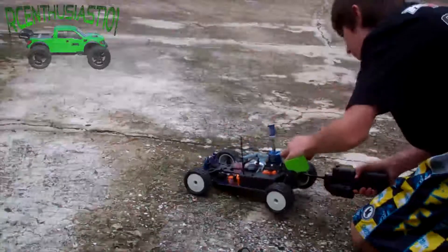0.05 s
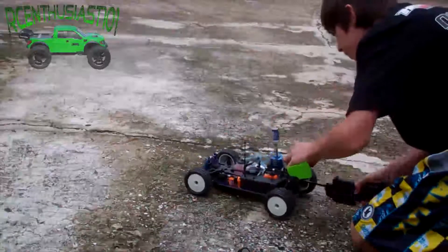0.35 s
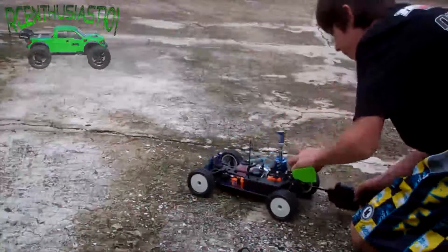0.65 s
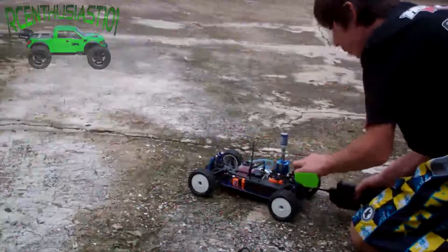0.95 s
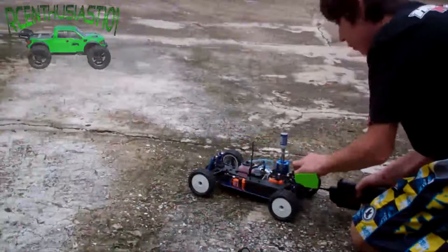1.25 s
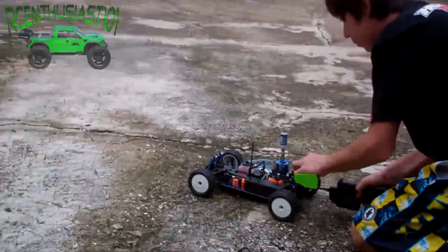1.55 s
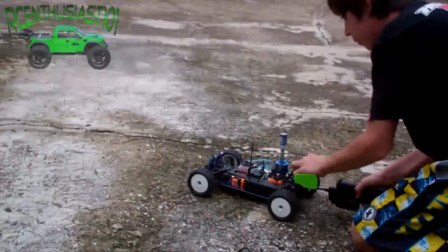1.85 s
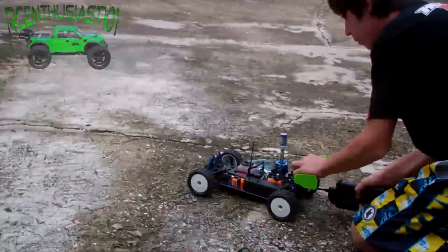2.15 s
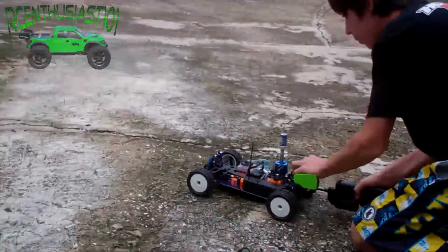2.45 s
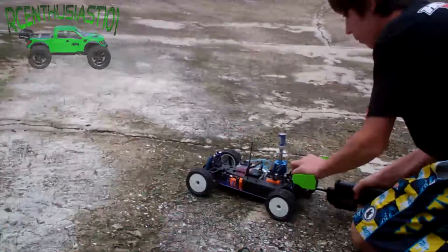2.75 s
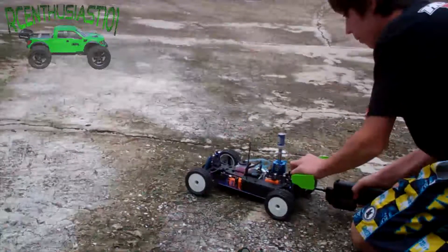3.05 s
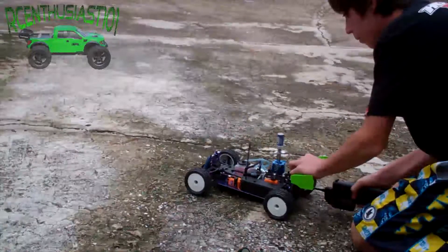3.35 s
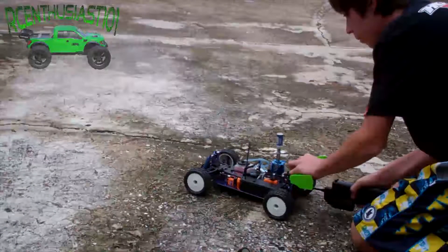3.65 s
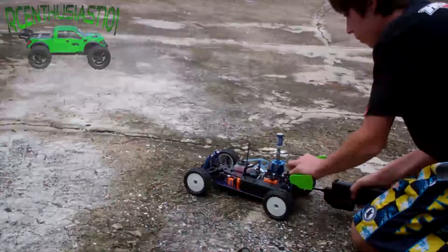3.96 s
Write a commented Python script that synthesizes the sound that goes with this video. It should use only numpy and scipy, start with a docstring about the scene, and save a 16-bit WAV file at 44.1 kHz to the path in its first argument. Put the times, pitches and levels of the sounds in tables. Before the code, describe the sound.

A model car engine is turned over by a hand-held electric starter in a concrete yard. After a few clicks over a faint low rumble, a fast, rasping gear rattle with puffing exhaust runs on without firing.

```python
"""A concrete yard, where a hand-held electric starter cranks the small glow engine of a model car.
The starter shaft clicks into its socket, then the gears grind and turn the engine about 32 times a
second without it catching. Every turn gives an exhaust puff, a knock as the gear play is taken up, and
a short rasp; the chassis rings and loose parts ping. A wall returns a dull echo, and a low outdoor
rumble lies beneath."""
import sys
import numpy as np
from scipy import signal
from scipy.fft import rfft, irfft
from scipy.io import wavfile

SR = 44100
rng = np.random.default_rng(int(sys.argv[2]) if len(sys.argv) > 2 else 0)


def wrap_up_sound(samples):
    """Save the sound to the file named by the first command line argument, as 16-bit audio."""
    columns = np.atleast_2d(samples).T
    # keep every value between -1 and 1, then stretch to whole-number steps
    tamed = np.clip(columns, -1, 1)
    steps = np.round(tamed * 32767).astype(np.int16)
    wavfile.write(sys.argv[1], SR, steps)


N = 176400
TIME = np.arange(N) / SR
HZ = np.maximum(np.fft.rfftfreq(N, 1 / SR), 1)
FIRST_TURN_S, CUTOFF_HZ = 1.0256, 14200
# Left-right coherence of the car's noises. Each row: frequency in Hz, coherence from 0 to 1.
CAR_COHERENCE = [(300, 1), (1200, 0.96), (2600, 0.9), (3400, 0.96), (5000, 0.7), (9000, 0.56),
                 (13500, 0.87)]


def gears():
    """Impact noise: teeth clash at random moments, each clash a decaying burst of its own strength."""
    # Loudness of the grinding. Each row: time in seconds, level in dB.
    grind = [(.955, -75), (.96, -30.5), (.967, -28), (.971, -30.5), (1.0, -25), (1.03, -27), (1.065, -29.5),
             (1.15, -28.5), (1.7, -29), (2.3, -29.5), (2.7, -28.5), (3.3, -29), (4, -29)]
    # Gear spectrum. Each row: frequency in Hz, relative density in dB.
    colour = [(25, -50), (100, -40), (300, -22.5), (550, -14), (800, -16), (1200, -13), (2300, -13),
              (3500, -11), (6200, -10.5), (8300, -7), (11000, -6), (12500, -2.2), (14000, -0.5)]
    clashes_per_s, spread_db, decay_s, flutter_db = 1500, 0.97, 0.0034, 0.88
    which, age = latest(TIME[rng.random(N) < clashes_per_s / SR])
    teeth = from_db(spread_db * rng.standard_normal(N)[which]) * np.exp(-abs(age) / decay_s)
    level = from_db(in_time(grind) + flutter_db * drift(rate_hz=27)) * (TIME > grind[0][0])
    return noise(level * rms_one(teeth), colour, CAR_COHERENCE)


def knock(turns):
    """Backlash: once a turn the gear play closes in an impact with a bright edge and a duller body."""
    # Crank angle in turns, then attack, hold and decay in seconds.
    timing = (.465, .0005, .0008, .0012)
    # Spectra of edge and body. Each row: frequency in Hz, relative density in dB.
    edge_colour = [(40, -60), (600, -22), (2000, -15), (4500, -8), (7000, -1), (9500, 1), (14000, 6.5)]
    body_colour = [(40, -50), (250, -24), (600, -5.5), (1500, 1), (2500, -2), (4000, -2), (7000, -9.5),
                   (14000, -29)]
    # The hardest knocks. Each row: time in seconds, extra level in dB.
    hard_knocks = [(1.043, 6.5), (1.148, 6), (1.181, 3), (1.346, 3.5), (2.093, 6), (2.254, 3.5), (2.57, 5),
                   (3.372, 6), (3.645, 5), (3.913, 5)]
    edge = stroke(turns, timing, edge_colour, level_db=-25.5, spread_db=1.5, accents=hard_knocks)
    body = stroke(turns, timing, body_colour, level_db=-33.5, spread_db=1.4)
    return edge + body


def rasp(turns):
    """Contact noise: a longer, softer burst from the metal follows each knock."""
    # Crank angle in turns, then attack, hold and decay in seconds.
    timing = (.56, .0008, .0044, .0007)
    # Rasp spectrum. Each row: frequency in Hz, relative density in dB.
    colour = [(40, -55), (200, -25), (600, -10.5), (2000, -8.5), (5000, -6.5), (6500, -4), (9000, -5),
              (14000, 1.5)]
    return stroke(turns, timing, colour, level_db=-32, spread_db=1.4)


def exhaust(turns):
    """Source and filter: one pressure pulse a turn rings the pipe and is band-passed by the silencer."""
    # Pipe modes. Each row: frequency in Hz, bandwidth in Hz, gain in dB.
    pipe = [(138, 4.7, -2.5), (369, 53, -15), (480, 96, -4.5), (656, 13, -6.5), (850, 70, -13),
            (1074, 29, -0.5), (1820, 110, -19)]
    puff_db, spread_db, rise_db_per_s = 3, 0.3, 0.64
    first_extra_db, settle_s = 5.5, 0.051
    times = at_angle(turns, 0)
    age = times - times[0]
    level_db = puff_db + first_extra_db * np.exp(-age / settle_s) + rise_db_per_s * age
    puffs = impulses(times, from_db(level_db + spread_db * rng.standard_normal(N)[:len(age)]))
    silencer = signal.butter(3, [176, 500], "band", fs=SR, output="sos")
    return resonate(puffs, pipe) - signal.sosfilt(silencer, puffs + 1e-18)


def chassis(metal):
    """Forced vibration: chassis and gear case add their resonances to the metal's noise."""
    # Their modes. Each row: frequency in Hz, bandwidth in Hz, gain in dB.
    modes = [(642, 54, 4), (860, 35, -10), (1053, 24, 1), (1780, 67, -11), (2720, 46, -8), (4040, 100, -8),
             (4760, 170, -4), (5180, 160, -8), (6300, 40, -22), (7580, 300, -5), (9460, 310, -11.5),
             (10860, 57, -1), (11100, 49, -10), (11700, 60, -8)]
    return metal + resonate(metal, modes)


def pings():
    """Free vibration: loose parts ring after random strikes, which harden as the cranking goes on."""
    # One mode a part. Each row: frequency in Hz, bandwidth in Hz, gain in dB.
    loose_parts = [(1803, 90, -6.5), (2640, 100, -7), (3200, 81, -8), (3950, 100, -4), (4720, 150, -2.5),
                   (5200, 110, -3.5), (7560, 97, -1.5), (9080, 150, 5)]
    strikes_per_s, strike_db, spread_db, rise_db_per_s = 20, 6, 2.0, 1.0
    out, age = 0, TIME - FIRST_TURN_S
    for part in loose_parts:
        struck = (rng.random(N) < strikes_per_s / SR) & (age > 0)
        size = from_db(strike_db + rise_db_per_s * age + spread_db * rng.standard_normal(N))
        out = out + resonate(struck * size, [part])
    return out


def socket():
    """Impact excitation: the shaft clicks into its socket; firm contacts ring the starter housing."""
    # Shaft contacts. Each row: start, attack, hold and decay in seconds, click and thump levels in dB.
    contacts = [(0.0398, 0.00016, 0.00074, 0.0031, -33, -68), (0.0555, 0.0024, .0005, 0.0023, -38.5, -70),
                (0.4141, 0.0013, 0.00076, .0025, -23.5, -26), (0.421, .002, 0.0066, 0.016, -42, -39),
                (.9685, .001, .002, .003, -22.5, -27.5), (.978, 0.0024, 0.0053, 0.012, -26.5, -27.5)]
    # Click spectrum. Each row: frequency in Hz, relative density in dB.
    click_colour = [(300, -41), (1500, -6.5), (2700, -2), (5000, -0.5), (6800, -3), (9500, 3),
                    (11000, -3.5), (14000, 1.5)]
    # Housing modes. Each row: frequency in Hz, bandwidth in Hz, gain in dB.
    housing = [(613, 64, -1), (790, 150, -17), (1030, 160, -12.5), (1270, 140, -17), (1690, 150, -14)]
    thump_s = .004
    click = thump = 0
    for start, attack, hold, decay, click_db, thump_db in contacts:
        shape = burst(TIME - start, attack, hold, decay)
        click = click + from_db(click_db) * shape
        thump = thump + from_db(thump_db) * shape
    starts, *_, thumps_db = np.transpose(contacts)
    push = impulses(starts + thump_s, from_db(thumps_db) * thump_s * SR)
    clicks = noise(click, click_colour, CAR_COHERENCE)
    rattle = 0.42 * np.sqrt(thump_s * SR) * thump * rng.standard_normal(N)
    return clicks + resonate(push + rattle, housing)


def yard(x):
    """Reflection: a wall adds a dull echo; the sound reaches the left microphone port slightly later."""
    # Lag of the left port behind the right. Each row: frequency in Hz, phase in radians.
    port_lag = [(100, 0), (2600, 0.12), (3600, 0.08), (4000, 0.77), (5300, 1.1), (7500, 1.3), (9500, 1.65),
                (12000, 2.5), (14000, 3)]
    echo_s, echo_db, wall_cut_hz, balance_db = .01045, -8, 1900, 0.17
    echo = from_db(echo_db) * np.exp(-2j * np.pi * HZ * echo_s) / (1 + 1j * HZ / wall_cut_hz)
    lag = np.exp(-1j * in_hz(port_lag) * np.array([[1], [0]]))
    half = SR // 10
    response = np.roll(irfft(lag * (1 + echo), N), half, axis=1)[:, :2 * half + 1]
    return signal.fftconvolve(x, response, "same", axes=1) * from_db([[balance_db], [-balance_db]])


def background():
    """Ambient noise: faint outdoor hiss over a low rumble that swells and ebbs."""
    # Outdoor spectrum. Each row: frequency in Hz, relative density in dB.
    colour = [(25, -28), (55, -15), (90, -15.5), (110, -2), (135, -1), (170, -10), (230, -11.5), (340, -17),
              (480, -13.5), (950, -16), (1600, -20.5), (2800, -28), (5500, -31), (8400, -29), (9700, -26),
              (11000, -30), (14000, -31)]
    # Left-right coherence. Each row: frequency in Hz, coherence from 0 to 1.
    coherence = [(60, 0.97), (150, 1), (380, 0.89), (950, 0.85), (2400, 0.27), (6000, .05)]
    # The background sinks under the cranking. Each row: time in seconds, relative level in dB.
    level = [(0, -1), (.96, -1.5), (1.06, -13.5), (4, -17)]
    air = noise(0.82, colour, coherence)
    rumble = signal.sosfiltfilt(signal.butter(2, 220, fs=SR, output="sos"), air)
    swell = from_db(1.5 * drift(rate_hz=13))
    return from_db(in_time(level) - 44) * (air + rumble * (swell - 1))


def stroke(turns, timing, colour, level_db, spread_db, accents=()):
    """Periodic excitation: a burst of contact noise at the same crank angle of every turn."""
    angle, attack, hold, decay = timing
    times = at_angle(turns, angle)
    offset_db = spread_db * rng.standard_normal(N)[:len(times)]
    for time_s, extra_db in accents:
        offset_db[np.argmin(abs(times - time_s))] = extra_db
    which, age = latest(times)
    envelope = from_db(level_db + offset_db)[which] * burst(age, attack, hold, decay)
    return noise(envelope, colour, CAR_COHERENCE)


def resonate(x, modes):
    """Modal superposition: damped resonators answer the same drive in parallel."""
    out = 0
    for hz, width, db in modes:
        r = np.exp(-np.pi * width / SR)
        feedback = [1, -2 * r * np.cos(2 * np.pi * hz / SR), r * r]
        out = out + from_db(db) * (1 - r * r) / 2 * signal.lfilter([1, 0, -1], feedback, x + 1e-18)
    return out


def noise(envelope, colour, coherence):
    """Partial coherence: shaped mid and side noises mix into left and right."""
    mid, side = rfft(rng.standard_normal((2, N)) * envelope)
    alike = np.clip(in_hz(coherence), 0, 1)
    gain = rms_one(from_db(in_hz(colour)) * (HZ < CUTOFF_HZ))
    return irfft(gain * (np.sqrt(1 + alike) * mid + np.sqrt(1 - alike) * side * [[1], [-1]]), N)


def burst(age, attack, hold, decay):
    """Linear rise, hold and exponential decay."""
    return np.clip(age / attack, 0, 1) * np.exp(-np.maximum(age - attack - hold, 0) / decay)


def drift(rate_hz):
    """Slow fluctuation: low-passed noise of rms 1."""
    return rms_one(irfft(rfft(rng.standard_normal(N)) / (1 + (HZ / rate_hz) ** 2), N))


def at_angle(turns, angle):
    """Phase crossings: the moments when the crank passes an angle, given in turns."""
    return np.interp(np.arange(angle, turns[-1], 1), turns, TIME)


def latest(times):
    """Index and age of the latest event at every sample."""
    which = np.maximum(np.searchsorted(times, TIME) - 1, 0)
    return which, TIME - times[which]


def impulses(times, sizes):
    """An impulse train."""
    return np.bincount((times * SR).astype(int), sizes, N)[:N]


def in_time(rows):
    """Linear interpolation over time."""
    return np.interp(TIME, *np.transpose(rows))


def in_hz(rows):
    """Interpolation over log frequency."""
    hz, value = np.transpose(rows)
    return np.interp(np.log(HZ), np.log(hz), value)


def from_db(db):
    """Decibels to amplitude ratio."""
    return 10 ** (np.asarray(db) / 20)


def rms_one(x):
    """Normalisation to rms 1."""
    return x / np.sqrt(np.mean(x ** 2) + 1e-20)


def scene():
    """Superposition: all sources add; crank angle, the integral of speed, times knock, rasp and puff."""
    # Crank speed. Each row: time in seconds, turns per second.
    speed = [(1.028, 27.618), (1.2, 30.192), (1.6, 30.749), (2.1, 30.959), (2.5, 32.158), (3.0, 31.999),
             (3.35, 33.194), (3.7, 33.386), (4.0, 33.117)]
    turns = np.cumsum(in_time(speed)) / SR
    turns = turns - np.interp(FIRST_TURN_S, TIME, turns)
    metal = knock(turns) + rasp(turns) + gears()
    car = chassis(metal) + pings() + exhaust(turns) + socket()
    return yard(car) + background()


def record(dry):
    """Band limiting: a steep low-pass filter removes the highest treble."""
    low_pass = signal.firwin(601, CUTOFF_HZ, window=("kaiser", 8), fs=SR)
    return signal.fftconvolve(dry, low_pass[None], "same", axes=1)


dry = scene()
out = record(dry)
wrap_up_sound(out)
```